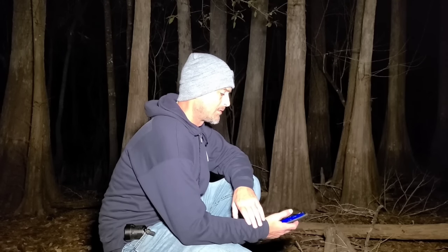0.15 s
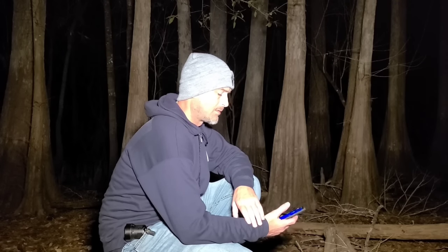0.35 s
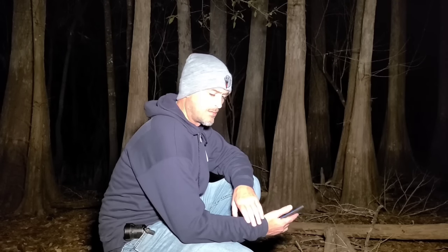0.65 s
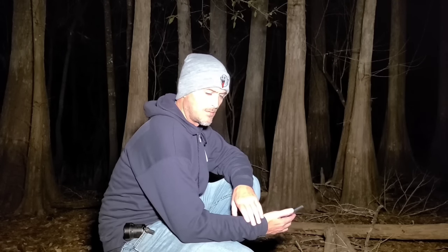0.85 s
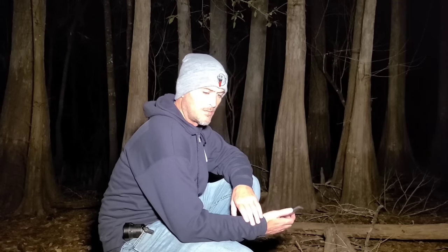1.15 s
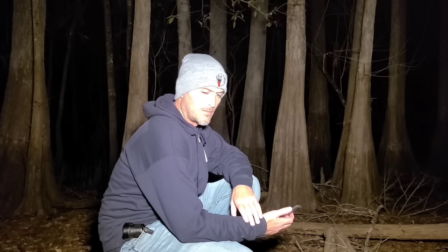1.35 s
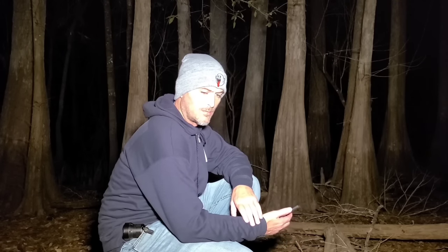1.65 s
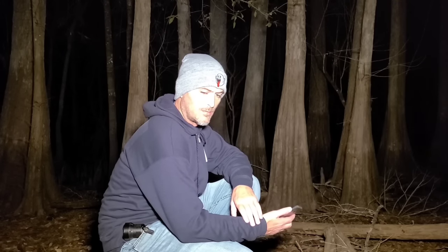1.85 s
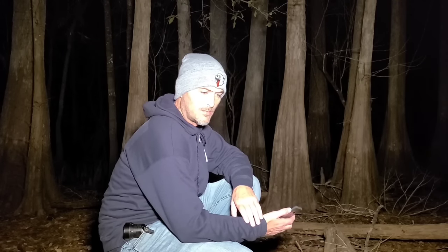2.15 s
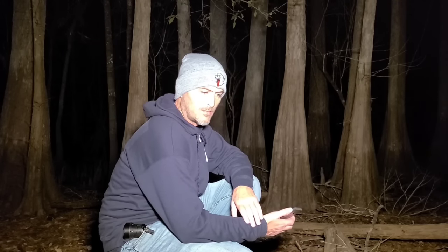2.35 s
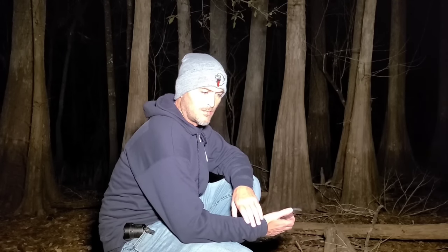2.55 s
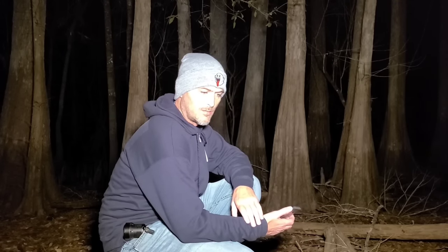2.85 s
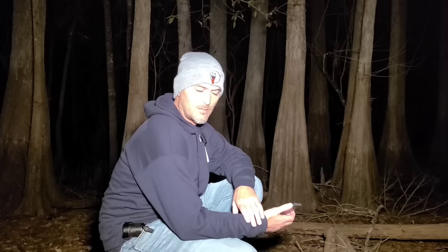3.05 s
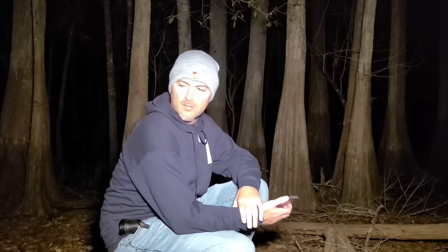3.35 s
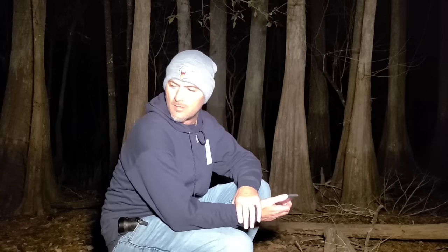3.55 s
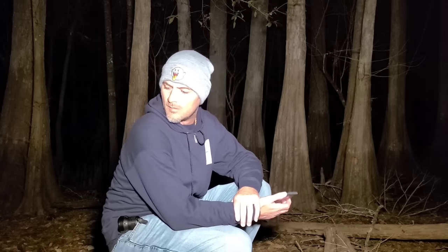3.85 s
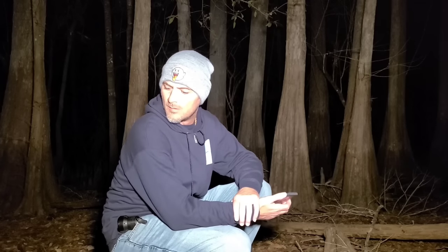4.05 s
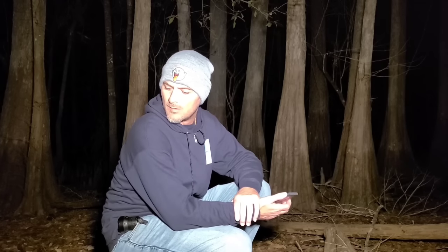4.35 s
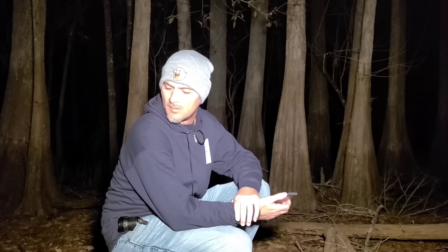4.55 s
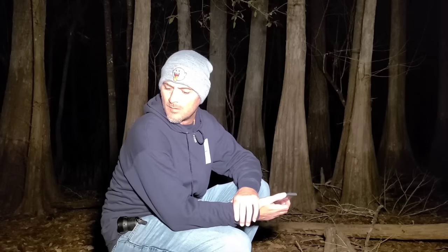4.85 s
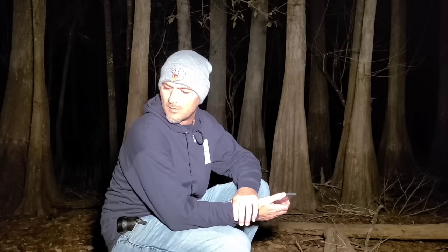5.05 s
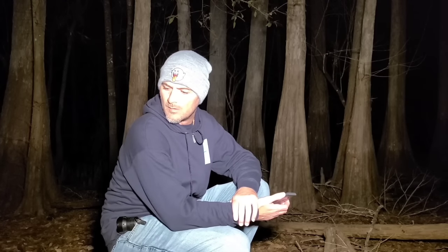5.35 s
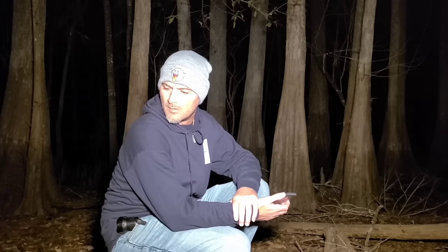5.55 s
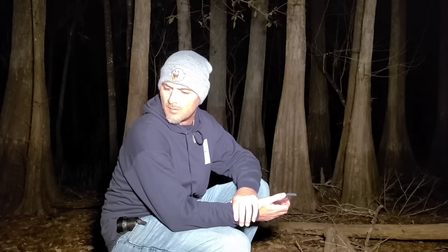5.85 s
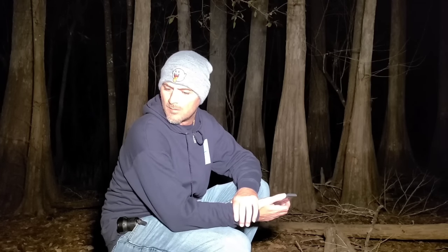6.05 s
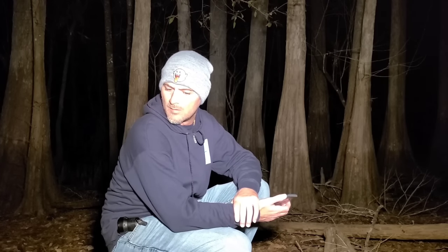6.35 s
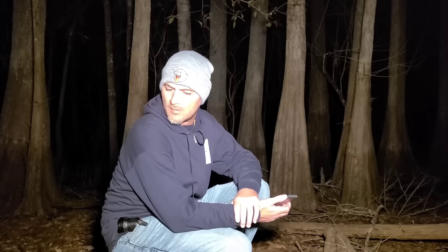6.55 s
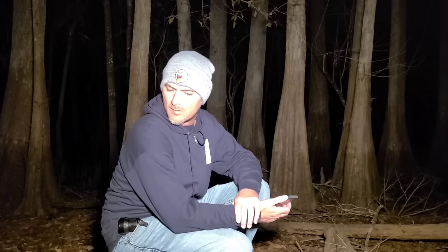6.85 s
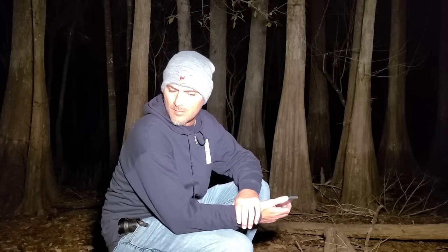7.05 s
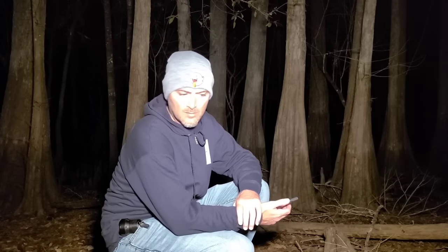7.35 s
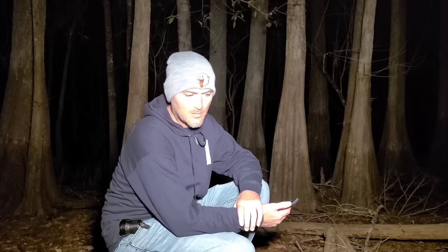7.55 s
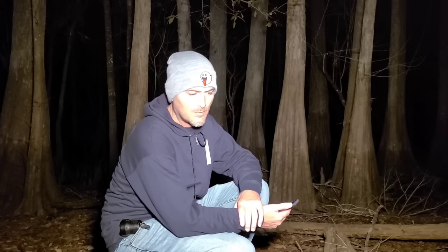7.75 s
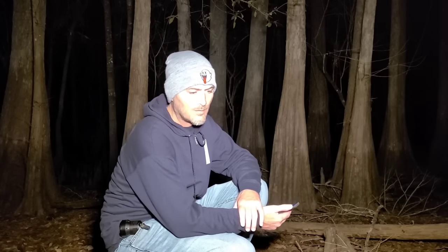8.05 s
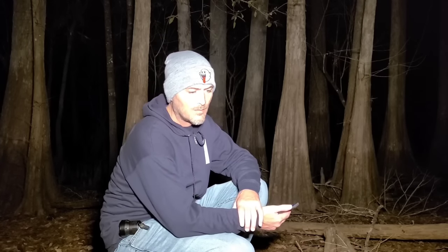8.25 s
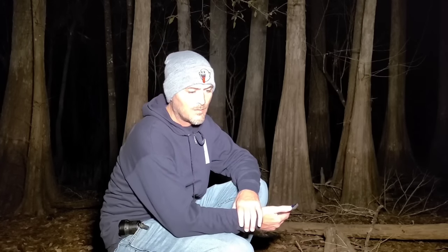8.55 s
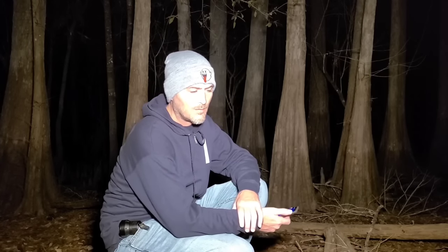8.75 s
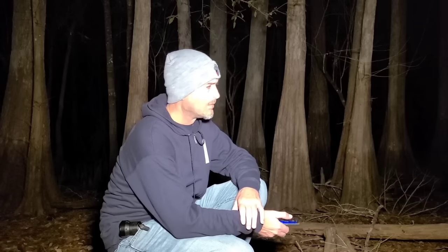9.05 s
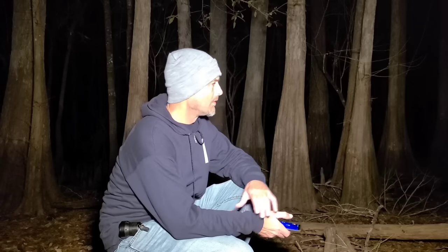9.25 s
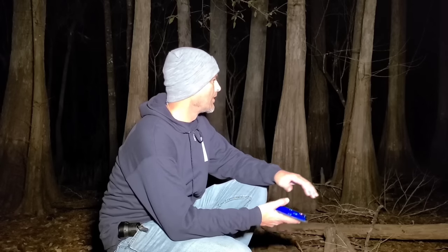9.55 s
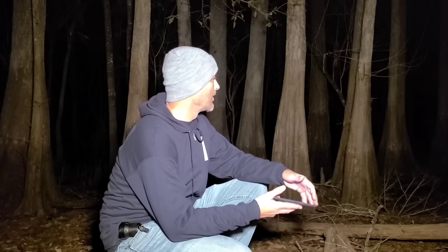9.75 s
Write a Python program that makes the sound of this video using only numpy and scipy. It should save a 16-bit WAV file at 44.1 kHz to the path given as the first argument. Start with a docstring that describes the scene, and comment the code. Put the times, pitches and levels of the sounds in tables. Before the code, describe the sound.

A stereo microphone in a night forest picks up rasping, nasal frog chatter in short runs, first on the left, then a lower voice slightly right with a higher one replying left. After a middle lull of only remote croaks, nearer frogs overlap again. Thin silvery cricket chirps and continuous trills surround them, with a barely audible katydid buzz, light hiss and a dull wavering far engine drone.

```python
"""Frogs and crickets in a forest at night

Frogs croak in bouts at about twelve a second: laryngeal pulses excite the resonances of sac, throat and body.
Crickets chirp in overlapping turns near 4 kHz, and others trill without a break: each wing stroke is a gliding tone.
Trunks scatter both as sparse, then dense, decaying echoes. A faint katydid, a distant frog chorus, the air of
the wood and microphone hiss are filtered noise; far traffic is a noise rumble with a wavering engine tone."""
import sys
import numpy as np
from scipy import signal
from scipy.fft import rfft, irfft, next_fast_len
from scipy.io import wavfile

SR = 44100
rng = np.random.default_rng(int(sys.argv[2]) if len(sys.argv) > 2 else 0)


def to_wav(sig):
    """Store sig (one row per channel, or 1-D mono) as 16-bit WAV at the path in sys.argv[1].

    Samples outside -1..1 are clipped; the rate is SR.
    """
    pcm = np.clip(np.atleast_2d(sig), -1, 1) * 32767
    pcm = np.round(pcm).astype(np.int16)
    wavfile.write(sys.argv[1], SR, pcm.T)  # frames by channels


N = 436570
TIME = np.arange(N) / SR   # t/s

# Frog bouts: (frog, croaks as [t/s, sac f/Hz, level/dB, sac bandwidth/Hz])
FROG_BOUTS = [ ("near", [(.398, 2070, -56, 400), (.481, 2080, -58, 400), (.562, 2046, -47.5, 220),
              (.639, 2100, -48, 300), (.719, 2070, -40.5, 200), (.801, 1750, -39, 330),
              (.881, 1787, -43.5, 470)]), ("near", [(1.376, 1880, -53.5, 397), (1.463, 1890, -48, 420),
              (1.55, 2046, -41, 170), (1.633, 1763, -40, 328), (1.716, 1770, -40.5, 370),
              (1.795, 1806, -44.5, 448)]), ("low", [(2.372, 1690, -53.5, 450), (2.452, 1670, -53.5, 450),
              (2.532, 1670, -49.5, 352), (2.613, 1700, -46.5, 300), (2.692, 1770, -39.5, 190),
              (2.771, 1490, -43, 397), (2.85, 1496, -42.5, 270), (2.93, 1500, -49, 330),
              (3.013, 1783, -47.5, 250), (3.097, 1450, -51.5, 750), (3.178, 1440, -53, 780),
              (3.257, 1400, -65, 700)]), ("far high", [(2.868, 2463, -55, 200), (2.951, 2523, -52.5, 220),
              (3.031, 2520, -51.5, 302), (3.104, 2310, -50.5, 400), (3.186, 2210, -51.5, 250),
              (3.265, 2345, -52.5, 256), (3.345, 2320, -55, 282)]), ("low", [(3.605, 1470, -46, 550),
              (3.686, 1456, -45.5, 350), (3.769, 1443, -44.5, 320), (3.852, 1260, -44, 280),
              (3.935, 1350, -44.5, 220), (4.02, 1372, -55, 230)]), ("far high", [(3.625, 2485, -59, 250),
              (3.71, 2487, -52.5, 201), (3.79, 2500, -52, 220), (3.87, 2400, -49.5, 330),
              (3.95, 2220, -50, 330), (4.035, 2420, -53.5, 400)]), ("low", [(4.443, 1160, -56, 780),
              (4.528, 1080, -53, 780), (4.614, 1210, -52.5, 780), (4.699, 1100, -49.5, 780),
              (4.784, 1090, -54, 774), (4.869, 1130, -52.5, 780)]), ("far high", [(4.448, 2230, -60, 200),
              (4.536, 2510, -55, 400), (4.624, 2515, -53, 250), (4.711, 2460, -51.5, 350),
              (4.792, 2250, -53.5, 330), (4.876, 2436, -56.5, 280)]),
              ("near high", [(8.325, 2310, -51.5, 402.6), (8.4, 2345, -48.5, 450), (8.474, 2454, -45, 550),
              (8.551, 2493, -42, 413), (8.626, 2437, -45, 400), (8.702, 2300, -55, 400)]),
              ("near", [(8.83, 1920, -52, 397), (8.916, 2070, -46.5, 300), (8.999, 2044, -42.5, 270),
              (9.083, 2024, -42.5, 230), (9.168, 1732, -38.5, 272), (9.251, 1927, -41, 420),
              (9.332, 1857, -52, 400)]), ("near high", [(8.96, 2280, -54, 450), (9.04, 2305, -49, 400),
              (9.12, 2330, -45.5, 410), (9.197, 2300, -44, 402), (9.281, 2310, -44, 380)]),
              ("near", [(9.596, 1947, -57, 397), (9.69, 1830, -60, 300), (9.785, 1877, -55, 348),
              (9.878, 1833, -49.5, 350)])]
# Voice and place of each frog: [throat f/Hz, body f/Hz, body level/dB, rasp level/dB, decay/snaps,
# left minus right/dB, echo level/dB, echo sac bandwidth as a share of the direct one]
FROG_VOICES = { "near": (1900, 580, -14.5, -7, 1.8, 4, 0.5, 0.83),
               "low": (1489, 548, -10, -4.5, 1.2, -2.5, 0.5, 1.18),
               "far high": (2320, 787, -9.5, -21, 1.5, 5, 5, 1.27),
               "near high": (2310, 824, -11, -8.5, 1.8, 5.5, -3.5, 1)}
# Bouts of frogs heard only by scattering: [t/s, duration/s, mid-bout f/Hz, mid-bout level/dB]
FAR_BOUTS = [(0, .05, 2092, -44.5), (1.12, .2, 2050, -54.5), (4.958, .3, 1885, -57), (5.3, 0.46, 1730, -57),
             (6.558, 0.29, 2328, -56), (6.798, 0.21, 2166, -61), (7.03, 0.23, 1885, -54),
             (7.4, .25, 2270, -57.5), (8.06, 0.31, 2156, -49.5), (8.37, 0.24, 1945, -49.5),
             (9.451, 0.43, 1857, -52.5)]
# Distant frog chorus, envelope before its gain: [t/s, level/dB]
CHORUS_ENVELOPE = [(0.0, -60), (0.2, -70), (0.36, -66.5), (2.28, -70), (3.06, -69), (3.39, -67),
                   (3.94, -63), (4.19, -67.5), (4.8, -69.5), (5.16, -70), (5.57, -67), (6.07, -76),
                   (8.13, -74.5), (8.52, -65.5), (9.9, -67)]
# Distant frog chorus, relative spectral density: [f/Hz, level/dB per Hz]
CHORUS_SPECTRUM = [(300, -19), (560, -6), (780, -0.5), (980, -3), (1400, 0), (1850, 3.5), (2400, -6),
                   (2900, -31), (5000, -40)]
# Near crickets, before the direct and echo gains: [mean f/Hz, level/dB, left minus right/dB, chirp duration/s]
CRICKET_VOICES = { "deep": (3680, -60, 1, 0.24), "low right": (3815, -63, -4, 0.21),
                  "near left": (3890, -61.5, 7.5, 0.23), "far left": (3824.5, -66.5, 13, .2),
                  "busy right": (3935, -62, -4, 0.17), "high ahead": (4010, -63, 1.5, 0.18),
                  "far ahead": (3935, -67.5, 2, 0.18), "thin": (4245, -72, 0, 0.14),
                  "thinnest": (4470, -71.5, 0, 0.17)}
# Chirp onsets of each near cricket: [t/s]
CHIRP_TIMES = { "deep": [2.45, 4.885, 7.825], "low right": [2.85, 6.54, 9.79], "near left": [.49, 2.56,
               4.34, 6.75, 8.9], "far left": [1.35, 4.6, 8.04], "far ahead": [0, .82, 1.1, 1.78, 2.04, 3.3,
               4.1, 5.2, 5.7, 6.22, 7.05, 7.67, 8.42, 9.08, 9.5], "busy right": [.18, .39, 1.24, 1.94, 3.05,
               4.77, 5.25, 5.5, 8.34], "high ahead": [.6, 3.17, 3.26, 5.5, 6.06, 6.19, 7.26, 8.32, 8.85,
               9.78], "thin": [.48, 3.12, 5.38, 7.65], "thinnest": [.14, 1.77, 3.78, 6.45, 8.5]}
# Unbroken trills of crickets deep in the wood, before the echo gain: [f/Hz, level/dB]
TRILL_VOICES = [(3890, -75), (3960, -78), (4520, -89)]
# Katydid buzz, envelope: [t/s, level/dB]
KATYDID_ENVELOPE = [(0, -78.5), (7, -79.5), (7.6, -76), (9.9, -77.5)]
# Katydid buzz, relative spectral density: [f/Hz, level/dB per Hz]
KATYDID_SPECTRUM = [(7500, -57), (9000, -2), (10500, 4.5), (11800, -5), (14000, -47)]
# Far traffic, envelope: [t/s, level/dB]
TRAFFIC_ENVELOPE = [(0.1, -48.5), (0.37, -48), (0.48, -43), (0.7, -47.5), (4.44, -47.5), (4.53, -44),
                    (4.77, -48), (5.5, -46), (5.99, -50), (6.02, -47.5), (9.82, -46.5), (9.85, -45)]
# Traffic rumble, relative spectral density: [f/Hz, level/dB per Hz]
RUMBLE_SPECTRUM = [(15, -20), (30, -14), (45, -0.5), (53, -2), (66, 3), (82, -2.5), (100, -6), (122, -5.5),
                   (150, -13.5), (220, -16.5), (270, -31), (500, -60)]
# Far wash of the wood, relative spectral density: [f/Hz, level/dB per Hz]
WOOD_AIR_SPECTRUM = [(120, -2.5), (260, -2), (330, -0.5), (420, 0), (560, 1.5), (660, -2), (790, 0),
                     (950, -12.5), (1400, -11.5), (2200, -26), (3000, -13), (4800, -13), (5600, -28.5),
                     (7200, -35.5)]
# Microphone self-noise, relative spectral density: [f/Hz, level/dB per Hz]
HISS_SPECTRUM = [(3000, 7), (6200, -2), (7200, -8), (8300, -6), (8900, 2.5), (10400, -3), (12000, 2.5),
                 (15500, 0.5)]
# Correlation of left and right in all stereo noise: [f/Hz, coefficient]
EAR_CORRELATION = [(60, 0.95), (125, 0.91), (250, 0.82), (500, 0.31), (1000, 0.036), (3000, 0.048),
                   (10000, 0.052)]

CROAKS_PER_S = 12.2         # in the far bouts
PITCH_SCATTER = 0.018       # relative standard deviation between far croaks
FAR_SWELL_DB, FAR_PITCH_DROP = 5, .05   # rise in level and relative fall in pitch over a far bout
TAUT_HOLD = 0.29            # exponent by which a narrow sac resonance lengthens the croak
RING_SETTLE, RING_RASP_DB = .2, -6.5    # echoes: share of the way to the throat's pitch, change of rasp
EAR_LAG_S = .00044          # delay of the direct croaks at the right ear
STROKES_PER_S = 44
ENGINE_HZ = 82.1
CUTOFF_HZ = 15350


def frogs():
    """Superposition: direct croaks differ in level and delay at the ears; their scattered part is more diffuse."""
    direct, scattered = np.zeros((2, N)), np.zeros((2, N))
    for name, croaks in FROG_BOUTS:
        throat_hz, body_hz, body_db, rasp_db, fade, pan_db, echo_db, ring_share = FROG_VOICES[name]
        for s, hz, level_db, width_hz in croaks:
            voice = croak(hz, width_hz, throat_hz, body_hz, body_db, rasp_db, fade)
            left, right = panned(from_db(level_db) * voice, pan_db)
            add(direct[0], s, left)
            add(direct[1], s + EAR_LAG_S, right)
            ring_hz = hz + RING_SETTLE * (throat_hz - hz)
            ring_rasp_db = rasp_db + RING_RASP_DB
            ring = croak(ring_hz, ring_share * width_hz, throat_hz, body_hz, body_db, ring_rasp_db, fade)
            add(scattered, s, panned(from_db(level_db + echo_db) * ring, 0.23 * pan_db))
    add_far_bouts(scattered)
    return direct + forest(scattered, t60=0.92, build_s=.014) + distant_chorus()


def croak(hz, width_hz, throat_hz, body_hz, body_db, rasp_db, fade,
          snap_gap_s=.00345, top_ratio=1.34, count=10):
    """Source and filter: laryngeal snaps ring sac, throat and body, while turbulent air adds a rasp."""
    size, k = SR // 16, np.arange(count)
    harshness = np.clip(width_hz / 400, .1, 2)   # a slack sac: a shorter, less even, more rasping croak

    # the gap is drawn to a whole number of sac periods
    gap = np.round(snap_gap_s * hz) / hz
    gaps = gap + harshness ** 2 * rng.normal(0, .00013, count)
    at = np.abs((np.cumsum(gaps) - gaps[0]) * SR).astype(int)
    uneven = from_db(rng.normal(0, 1.65, count))
    swell_and_fade = (k + 1.02) * np.exp(-k * harshness ** TAUT_HOLD / fade)
    snaps = np.zeros(size)
    snaps[at] = swell_and_fade * uneven

    sac = resonance(snaps, hz, width_hz)
    sac = resonance(sac, throat_hz, width_hz=600)
    sac = rms_one(resonance(sac, hz, width_hz=1400))
    body = rms_one(resonance(snaps, body_hz, 110))

    # air rushes through the larynx after every snap, decaying over 4.3 ms
    rush_envelope = signal.lfilter([1], [1, -np.exp(-1 / (0.0043 * SR))], snaps)
    rush = rush_envelope * rng.standard_normal(size)
    rasp_band = signal.butter(2, [680, 1750], "band", fs=SR, output="sos")
    rasp = rms_one(signal.sosfilt(rasp_band, rush))

    sound = sac + from_db(body_db) * body + from_db(rasp_db) * harshness ** 2 * rasp
    sound = signal.sosfilt(signal.butter(6, top_ratio * throat_hz, fs=SR, output="sos"), sound)
    return sound / np.sqrt(np.sum(sound ** 2) / (0.0068 * SR))   # equal energy for every croak


def add_far_bouts(scattered):
    """Beyond the direct field only scattering arrives: these bouts swell in level as their pitch tends downward."""
    for s, length, hz, level_db in FAR_BOUTS:
        for start in np.arange(s, s + length, 1 / CROAKS_PER_S):
            progress = (start - s) / length - .5
            pitch = hz * (rng.normal(1, PITCH_SCATTER) - FAR_PITCH_DROP * progress)
            far = croak(pitch, 450, pitch, body_hz=630, body_db=-13, rasp_db=-7.5, fade=1.7)
            add(scattered, start, from_db(level_db + FAR_SWELL_DB * progress) * far)


def distant_chorus(gain_db=3):
    """Incoherent summation: the voices of a distant chorus merge into coloured noise of wavering level."""
    level_db = gain_db + envelope_db(CHORUS_ENVELOPE) + drift(24)
    return panned(from_db(level_db) * stereo_noise(CHORUS_SPECTRUM), pan_db=-3.5)


def crickets(direct_db=-5.0, echo_db=-1.0):
    """Direct and scattered fields: near chirps arrive by both, the unbroken far trills by scattering alone."""
    near, far = np.zeros((2, N)), np.zeros(N)
    for name, (hz, level_db, pan_db, length) in CRICKET_VOICES.items():
        for s in CHIRP_TIMES[name]:
            add(near, s, panned(from_db(level_db) * chirp(length, hz), pan_db))
    for hz, level_db in TRILL_VOICES:
        add(far, 0, from_db(level_db) * stridulate(N / SR, hz, sweep=0.06))
    far *= from_db(2.7 * drift(3.7))
    echoes = forest(near + far, t60=0.42, build_s=0.002)
    return from_db(direct_db) * near + from_db(echo_db) * echoes


def chirp(length, hz, swell_s=0.0075, release_s=0.045):
    """Amplitude envelope: a short run of wing strokes swells and is released exponentially."""
    strokes = stridulate(length, hz * rng.normal(1, .003), sweep=.055)
    t = TIME[:len(strokes)]
    return strokes * (1 - np.exp(-t / swell_s)) * (1 - np.exp(-t[::-1] / release_s))


def stridulate(length, hz, sweep, duty=.62):
    """Stridulation: scraper on file sounds a tone at each wing closing, falling in pitch as the wings slow."""
    t = TIME[:int(length * SR)]
    strokes = t * STROKES_PER_S * rng.normal(1, 0.012)
    stroke = strokes % 1 / duty   # 0 to 1 while closing, above 1 in the silence between
    which = strokes.astype(int)
    force, detune = rng.standard_normal((which[-1] + 1, 2))[which].T   # drawn anew for every stroke
    pitch = hz * (1 - sweep * (stroke ** 4 - .1) + .003 * detune)
    pulse = from_db(1.5 * force) * np.sin(np.pi * np.minimum(stroke, 1))
    return rms_one(pulse * np.sin(2 * np.pi * np.cumsum(pitch) / SR))


def katydid():
    """Band-limited noise: a far katydid's buzz is noise centred near 10 kHz under a slow envelope."""
    return panned(from_db(envelope_db(KATYDID_ENVELOPE)) * stereo_noise(KATYDID_SPECTRUM), pan_db=-5)


def traffic(rumble_db=0.0, drone_db=-7.0):
    """Noise and tone: a dull rumble joins an engine note that wavers and gains level as the vehicle nears."""
    level = from_db(envelope_db(TRAFFIC_ENVELOPE))
    nearing = from_db(np.interp(TIME, [3.0, 8.0], [-2, 2]))
    pitch = ENGINE_HZ + 2.544 * drift(7)
    note = np.sqrt(2) * np.sin(2 * np.pi * np.cumsum(pitch) / SR)
    note = note * from_db(4.4 * drift(4.6))
    rumble = from_db(rumble_db) * stereo_noise(RUMBLE_SPECTRUM)
    return panned(level * (rumble + from_db(drone_db) * nearing * note), pan_db=-1.5)


def wood_air():
    """Stationary noise: the far wash of the wood has a fixed spectrum and a constant level."""
    return panned(from_db(-60.0) * stereo_noise(WOOD_AIR_SPECTRUM), pan_db=-0.4)


def microphone_hiss():
    """Self-noise: the microphone adds a treble hiss of slightly wavering level."""
    return panned(from_db(-68.0 + .5 * drift(10)) * stereo_noise(HISS_SPECTRUM), pan_db=2.3)


def forest(x, t60, build_s):
    """Multiple scattering: echoes off the trunks begin sparse and crowd into a smooth tail of unit energy."""
    t = TIME[:SR]
    density = 400 + 15000 * t   # echoes per second
    heard = rng.random((2, SR)) < density / SR
    echoes = rng.standard_normal((2, SR)) * heard / np.sqrt(density)
    echoes *= from_db(-60 * t / t60) * (1 - np.exp(-t / build_s))
    echoes /= np.linalg.norm(echoes, axis=1, keepdims=True)
    return signal.fftconvolve(np.atleast_2d(x), echoes, axes=1)[:, :N]


def stereo_noise(spectrum):
    """Interaural correlation: mid and side noise give ears alike in the bass, unrelated in the treble; rms 1."""
    size = next_fast_len(N)
    log_hz = np.log(np.arange(size // 2 + 1) * SR / size + 1)

    def on_log_axis(table):
        """Linear interpolation over the logarithm of frequency."""
        hz, value = np.transpose(table)
        return np.interp(log_hz, np.log(hz), value)

    alike = np.clip(on_log_axis(EAR_CORRELATION), -1, 1)
    mid, side = rfft(rng.standard_normal((2, size))) * from_db(on_log_axis(spectrum))
    ears = np.sqrt(1 + alike) * mid + np.sqrt(1 - alike) * side * [[1], [-1]]
    return rms_one(irfft(ears, size)[:, :N])


def resonance(x, hz, width_hz):
    """Damped oscillator: a two-pole band-pass with a gain of about 1 at its peak."""
    r = np.exp(-np.pi * width_hz / SR)
    zeros = np.array([1, 0, -1]) * (1 - r * r) / 2
    poles = [1, -2 * r * np.cos(2 * np.pi * hz / SR), r * r]
    return signal.lfilter(zeros, poles, x)


def drift(rate):
    """Random modulation: unit-variance values, rate per second, joined by straight lines."""
    knots = rng.standard_normal(int(rate * N / SR) + 2)
    return np.interp(TIME * rate, np.arange(len(knots)), knots)


def envelope_db(table):
    """Level against time: linear interpolation in dB."""
    return np.interp(TIME, *np.transpose(table))


def from_db(db):
    """Logarithmic level: 20 dB is a factor of ten in amplitude."""
    return 10 ** (np.asarray(db) / 20)


def rms_one(x):
    """Normalisation: scales the root mean square to 1."""
    return x / np.sqrt(np.mean(x ** 2) + 1e-20)


def panned(x, pan_db):
    """Interaural level difference: left exceeds right by pan_db."""
    return x * from_db([[pan_db / 2], [-pan_db / 2]])


def add(track, s, sound):
    """Superposition: mixes a sound in from time s on."""
    at = int(np.clip(s * SR, 0, N - 1))
    track[..., at:at + sound.shape[-1]] += sound[..., :N - at]


def scene():
    """Linear superposition of all sources."""
    return frogs() + crickets() + katydid() + traffic() + wood_air() + microphone_hiss()


def record(dry):
    """Band limitation: a steep elliptic low-pass removes the top of the spectrum."""
    low_pass = signal.ellip(12, .1, 70, CUTOFF_HZ, fs=SR, output="sos")
    return signal.sosfilt(low_pass, dry)


dry = scene()
out = record(dry)
to_wav(out)
```